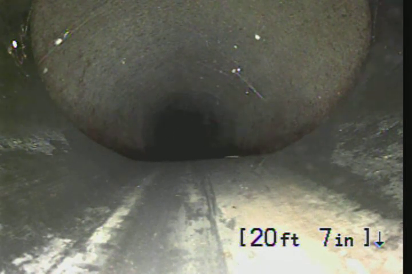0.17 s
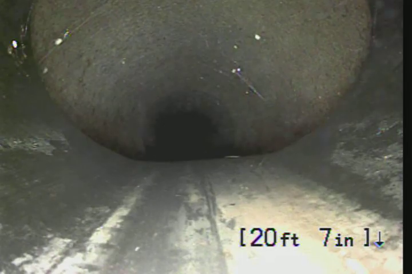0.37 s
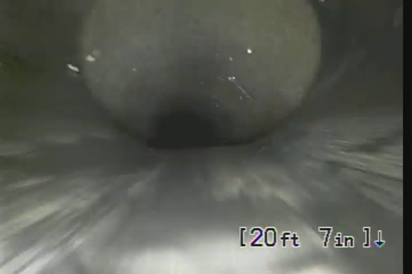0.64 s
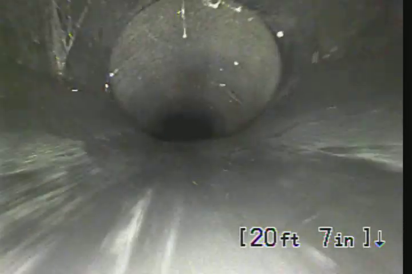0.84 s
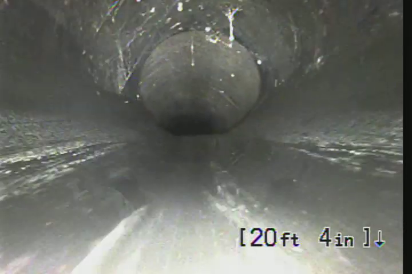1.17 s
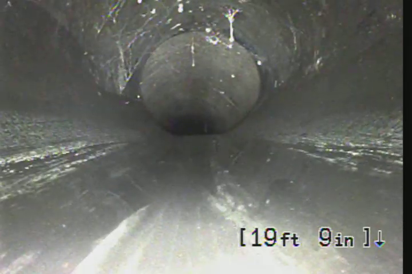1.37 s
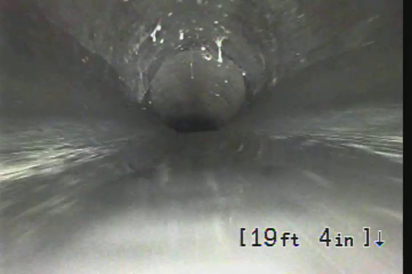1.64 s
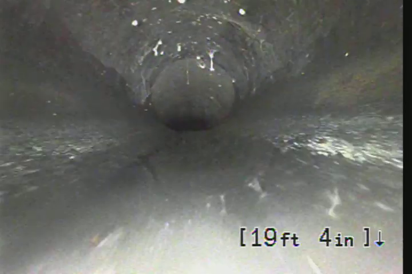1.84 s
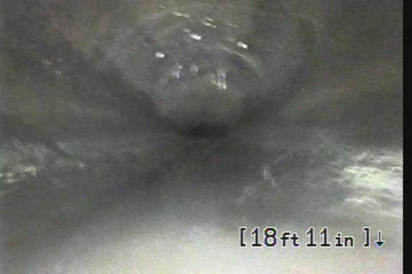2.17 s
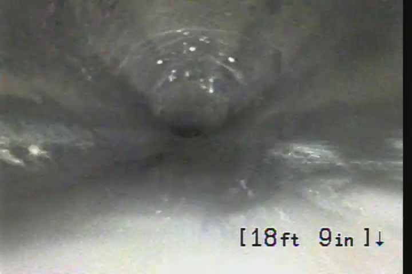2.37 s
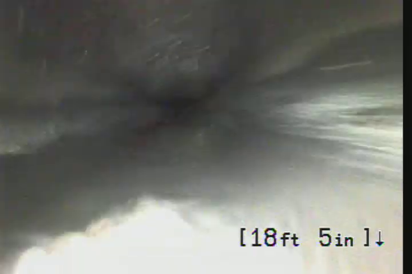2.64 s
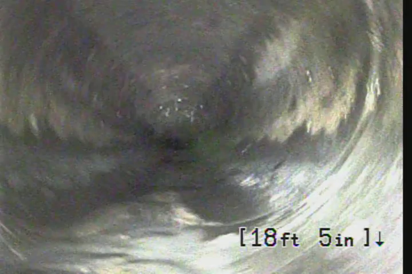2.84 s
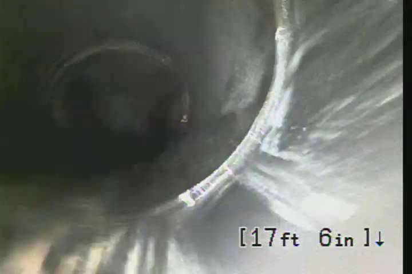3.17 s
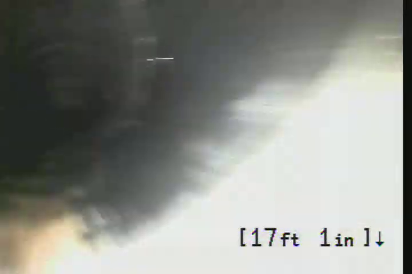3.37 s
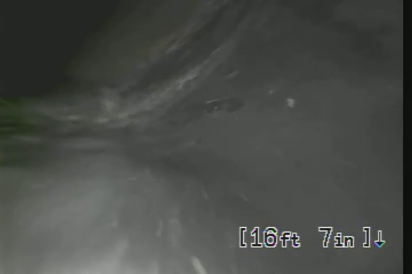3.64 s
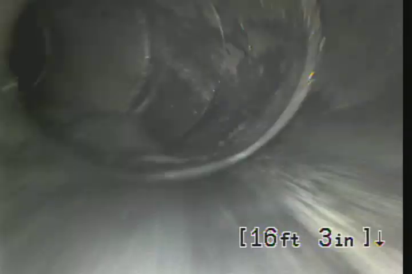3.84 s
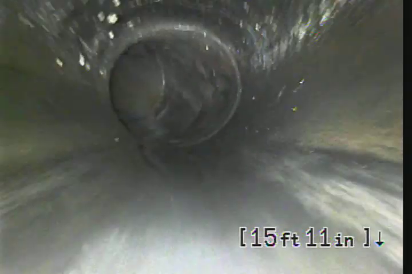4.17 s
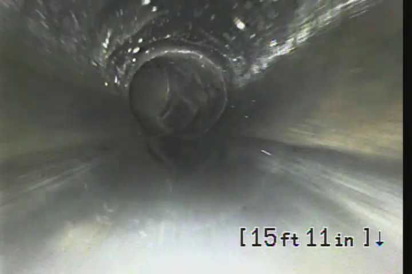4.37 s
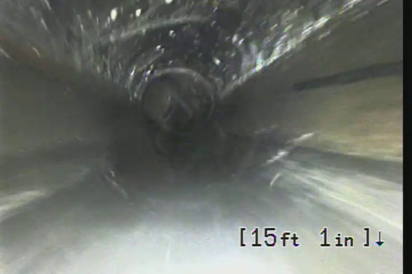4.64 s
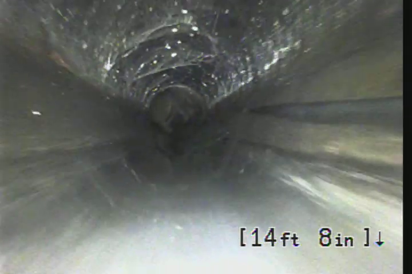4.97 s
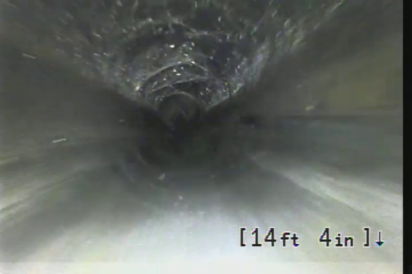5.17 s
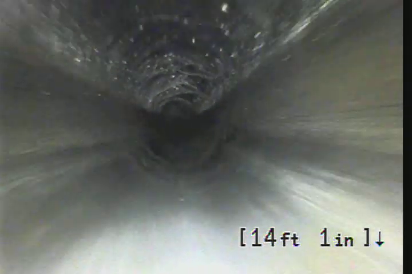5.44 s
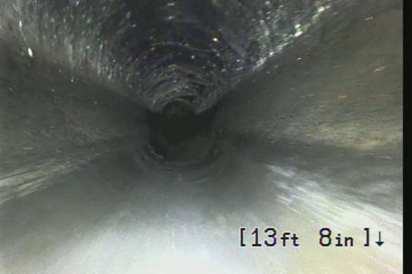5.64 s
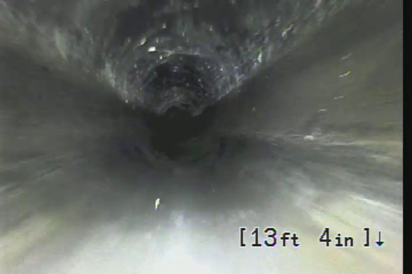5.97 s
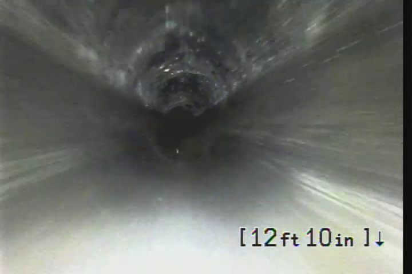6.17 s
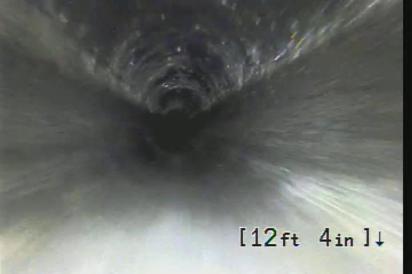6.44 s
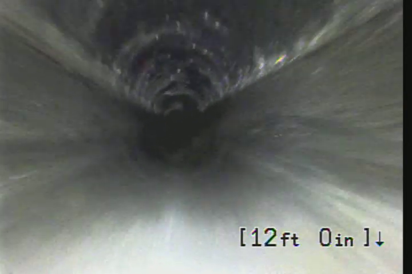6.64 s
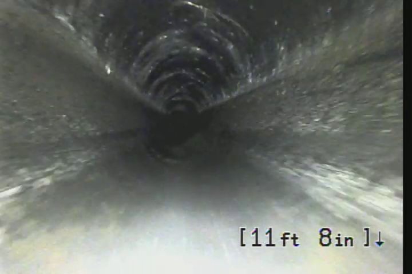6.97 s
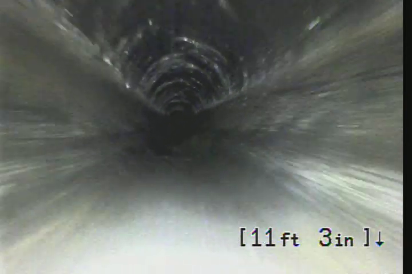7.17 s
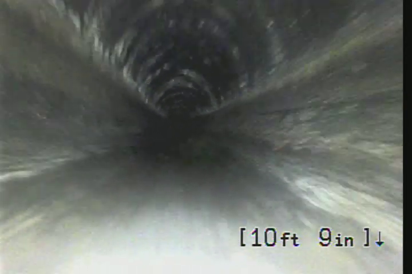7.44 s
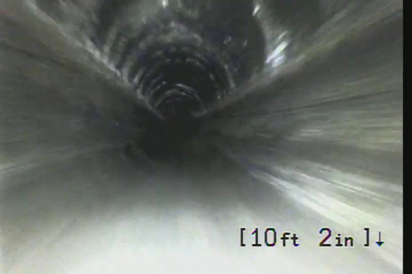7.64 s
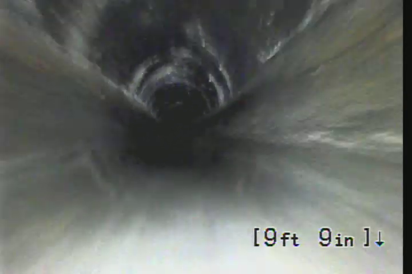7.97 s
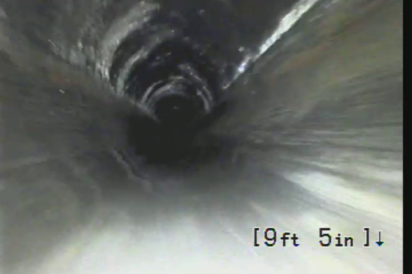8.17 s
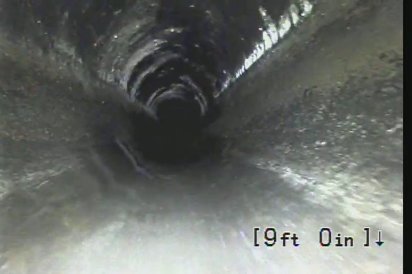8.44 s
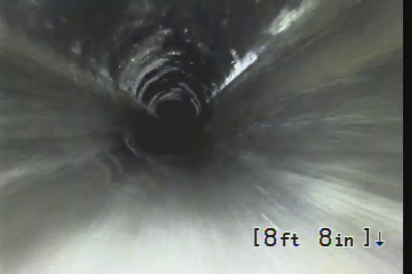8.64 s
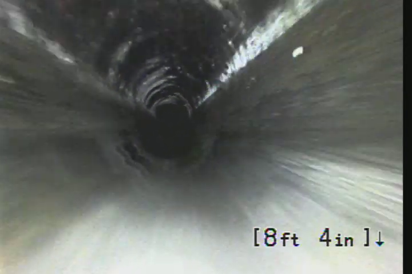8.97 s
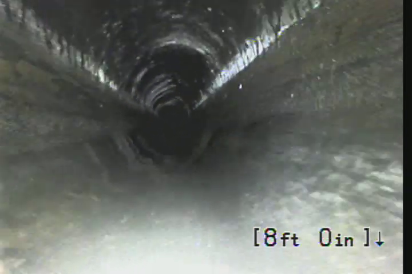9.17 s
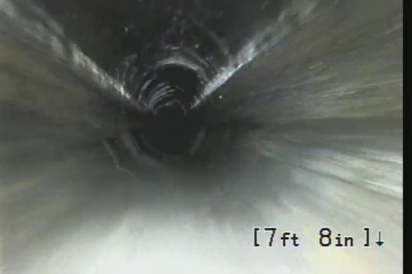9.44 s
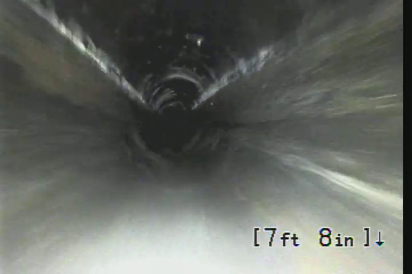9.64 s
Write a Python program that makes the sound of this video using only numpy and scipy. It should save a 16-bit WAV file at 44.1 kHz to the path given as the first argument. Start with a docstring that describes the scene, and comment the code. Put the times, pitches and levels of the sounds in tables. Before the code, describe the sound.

Over constant low room noise, a sliding cable hisses and scrapes, rising and easing with each pull. Clicks, short chattering slaps and hollow dragging notes come from the reel cage, while its drum thuds and rumbles softly around a low pitch. Quieter gaps separate clusters of knocks, the loudest near five and seven seconds. A small cased microphone makes everything muffled and midrange, distorting on the strongest hits.

```python
"""An inspection cable is hauled out of a drain and wound into its hollow drum: hiss and scrape are shaped noise.
Slaps and rubs on the cage are bursts of chattering noise; drags are resonant noise; single contacts are decaying sines.
Thuds and rolling ring two drum modes near 200 Hz, over steady room noise; a narrow treble band flickers.
A narrow-band microphone in a small case colours everything and overloads on the hardest blows."""
import sys
import numpy as np
from scipy.fft import rfft, irfft, next_fast_len
from scipy.io import wavfile
from scipy.ndimage import map_coordinates

SR = 44100
rng = np.random.default_rng(int(sys.argv[2]) if len(sys.argv) > 2 else 0)


def master_out(mix):
    """Clip the mix to full scale and print it as 16-bit PCM to the path in sys.argv[1]."""
    frames = np.transpose(np.atleast_2d(mix))
    ceiling = np.clip(frames, -1, 1)
    pcm = np.round(ceiling * 32767).astype(np.int16)
    wavfile.write(sys.argv[1], SR, pcm)


N = 432621  # samples

# Steady background spectrum: (frequency [Hz], relative density [dB per Hz])
ROOM_SPECTRUM = [(12, -50.5), (20, -30), (83, 1), (204, -3), (267, -6), (406, -8), (551, -21), (822, -15),
                 (1510, -26), (1900, -31), (2470, -64), (4180, -120)]
# Treble passband of the case: (frequency [Hz], relative density [dB per Hz])
TREBLE_SPECTRUM = [(1120, -48.5), (1900, -24), (1980, -21.5), (2090, -9), (2260, -14.5), (2580, -2),
                   (2740, 0.5), (3160, 0.5), (3590, -2.5), (4010, -16), (4450, -44.5), (5780, -61),
                   (9790, -120)]
# Antiresonance of the case: (frequency [Hz], width [Hz])
CASE_NOTCH = (1989, 318)
# Drum modes, lower and upper: (frequency [Hz], width [Hz])
DRUM_MODES = [(181, 24), (211, 21.5)]
# Ring of a thud in the lower and upper drum mode: (t60 [s])
THUD_T60_S = [0.16, 0.11]
# Thuds on the drum: (time [s], strength [dB], share of the lower mode [0-1])
THUDS_ON_DRUM = [(.66, -16.5, 0.76), (.695, -18, 0.74), (.734, -14, 0.8), (.765, -11, .4), (.79, -12, 0.35),
                 (.84, -16, .3), (0.879, -11.5, 0.15), (.953, -17, 0.2), (1.073, -9, 0.37),
                 (1.114, -14.5, 0.03), (1.159, 3, 0.02), (1.222, -5.5, 0.32), (1.625, -2, 0.75),
                 (1.644, 3, 0.25), (1.678, -7.5, 0.47), (2.408, -7.5, 0.5), (2.424, -18, 0.5),
                 (2.813, -15, 0), (2.834, -7.5, 0.23), (2.945, -10, 0.45), (2.958, -9, 0.07),
                 (2.991, -9, 0.47), (3.209, -7, .4), (3.98, -15, 0.26), (4.027, -16.5, .4),
                 (4.051, -9, 0.32), (4.112, -12.5, .4), (4.25, -9.5, 0.26), (4.338, -10, 0.4),
                 (4.47, -16, .2), (4.994, -20, 0), (5.08, 6, 0.58), (5.107, 7.5, 0.1), (5.119, -0.5, .4),
                 (5.138, -4, 0.1), (5.168, -8.5, 0.4), (5.627, -10.5, 0.71), (5.744, -2, .3),
                 (5.831, -3, 0.5), (5.888, -8, .6), (6.332, -15, 0.1), (6.37, -8, 0.43), (6.518, -12, 0.34),
                 (6.768, 5.5, 0.39), (7.012, -17, 0), (7.089, -9, 0.27), (7.117, 1, 0.24),
                 (7.133, 8.5, 0.22), (7.153, 3.5, 0.04), (7.175, 1, .1), (7.193, -10, 0.24),
                 (7.222, -5.5, .2), (7.262, -11.5, 0.12), (7.734, -12.5, 0.04), (7.784, -10.5, 0.5),
                 (7.874, -3.5, 0), (7.936, -11, 0.25), (7.982, -14.5, 0), (8.585, -11, .3),
                 (8.665, -13, 0.32), (8.901, -11, .8), (8.928, -5, 0.45), (8.947, -10, 0.34),
                 (9.318, -14.5, 0.66), (9.429, -9.5, 0.22)]
# Cable rolling in the drum: (time [s], boom level [dB])
ROLL_LEVEL = [(0.0, -56), (0.6, -48), (0.82, -32), (1.97, -48), (2.21, -36), (3.99, -40), (4.18, -33.5),
              (4.75, -40.5), (5.14, -35), (5.57, -46), (5.82, -33), (6.09, -40.5), (6.91, -38), (7.24, -29),
              (7.49, -37.5), (9.23, -43.5), (9.45, -34.5), (9.81, -36)]
# Cage resonances: (frequency [Hz], width [Hz], gain [dB])
CAGE_MODES = [(320, 85, -2), (779, 115, -2.5), (1063, 133, -1.5), (1574, 295, -6.5)]
# Single clean contacts: (time [s], tick level [dB], knock level [dB], push level [dB])
CONTACTS = [(0.0508, -2.5, 2.5, -10.5), (0.162, -11, -39, -43), (1.0655, -2, -28, -36),
            (1.4616, -7, -32, -30), (2.3287, -9.5, -27, -35), (2.7277, -19, -20, -32),
            (2.7706, -21, -19, -25), (2.9562, -15, -12.5, -32), (2.9791, -0.5, -16, -20),
            (3.0274, -28, -14.5, -24), (3.9483, 0.5, -23, -19.5), (5.0536, -10.5, -6.5, -6),
            (5.0882, 2, -8, -11), (5.0915, 2.5, -5, -5), (5.8295, -1, -14, -14.5), (7.1435, 5, -3, -6.5),
            (7.643, 3.5, -24, -18), (8.8853, -14, -12, -24), (8.9779, -13.5, -27, -22),
            (9.0161, -11, -34, -23), (9.0743, -17, -38, -34)]
# Modes of a contact, in the order tick, knock, push: (frequency [Hz], t60 [s])
CONTACT_MODES = [(3107, 0.0052), (713, 0.015), (317, 0.025)]
# Rattling slaps on the cage: (time [s], bright level [dB], woody level [dB], decay length [s])
CAGE_SLAPS = [(0.051, -17.5, -19.5, 0.0068), (.587, -33, -39, 0.016), (0.6344, -25.5, -23, 0.01),
              (0.762, -37, -32, 0.022), (0.847, -29.5, -37, 0.011), (1.0658, -17, -14.5, 0.0058),
              (1.152, -11.5, -14.5, .0066), (1.221, -15, -18, .006), (1.6153, -13, -15.5, 0.0099),
              (1.626, -18, -12.5, 0.0094), (1.919, -32.5, -30.5, 0.016), (2.402, -31, -27, 0.0061),
              (2.811, -33, -33, 0.039), (2.975, -21, -16.5, 0.0036), (3.2064, -19.5, -21, 0.0077),
              (5.067, -29, -25, .008), (5.0762, -15, -12.5, 0.0084), (5.0887, -8, -7, 0.0057),
              (5.098, -14, -14, 0.0064), (5.8266, -10, -14.5, 0.0066), (5.886, -25, -24, 0.0096),
              (6.326, -32.5, -29.5, 0.018), (6.7544, -12.5, -9.5, 0.0082), (7.076, -33, -36, 0.023),
              (7.1246, -10.5, -10.5, 0.0084), (7.141, -10, -8, .007), (7.865, -20.5, -14, 0.0058),
              (8.664, -28, -38, .007), (8.921, -20, -18.5, 0.0089), (9.429, -26, -21.5, 0.012)]
# Drags over the cage: (start [s], length [s], hollow note level [dB], low note level [dB])
CAGE_DRAGS = [(0.51, 0.44, -43, -49.5), (1.1, 0.18, -43, -46), (1.4, 0.42, -49, -49),
              (2.086, 0.065, -40, -45), (2.095, 0.31, -50.5, -42.5), (2.62, 0.27, -42, -48),
              (2.92, 0.15, -38, -47), (3.196, 0.3, -45, -40), (4.11, 0.29, -49.5, -47),
              (5.246, 0.2, -57, -43), (5.675, 0.24, -43, -37.5), (7.078, 0.18, -42, -40),
              (8.505, 0.14, -45, -50), (8.86, 0.24, -52, -42.5), (9.336, 0.18, -49.5, -41.5)]
# How hard the cable slides: (time [s], guide hiss level [dB])
HAUL_LEVEL = [(0.0, -43.5), (0.38, -49.5), (0.6, -47.5), (1.01, -37.5), (1.17, -37), (1.94, -44),
              (2.68, -36), (3.17, -38.5), (3.41, -34), (3.79, -40.5), (4.34, -35.5), (4.92, -39.5),
              (5.11, -39.5), (6.06, -36), (6.61, -39), (7.65, -35), (7.87, -38), (8.91, -39), (9.48, -42),
              (9.81, -36)]

ROOM_DB = -36
HAUL_MID_DB = -39  # usual haul, at which the scrape and low note levels hold
SCRAPE_DB, SCRAPE_DB_PER_HAUL_DB = -42, 0.88
LOW_NOTE_DB, LOW_NOTE_DB_PER_HAUL_DB = -51.5, 0.8
FLICKER_RE_HAUL_DB = -28.5
DRAG_EDGE_S = 0.032
RUB_COUNT, RUB_LENGTH_S = 60, 0.015
RUB_RE_HISS_DB, RUB_SPREAD_DB = 0, 6  # spread is the full width
PREAMP_TOP, PREAMP_KNEE, OUTPUT_TOP = 0.697, 8, 0.712  # amplitude, exponent, amplitude
CHANNEL_HZ, TOP_HZ = 4580, 16000


def amp(db):
    """Gain of a level in dB."""
    return 10 ** (np.asarray(db) / 20)


def unit(x):
    """x at rms 1."""
    return x / np.sqrt(np.mean(x ** 2) + 1e-20)


def curves(rows):
    """One value per sample for each column after the time."""
    time_s, *columns = np.transpose(rows)
    return [np.interp(np.arange(N) / SR, time_s, column) for column in columns]


def wobble(rate_hz):
    """Smooth random curve, rate_hz knots a second."""
    knots = rng.standard_normal(int(N * rate_hz / SR) + 4)
    return map_coordinates(knots, [np.arange(N) * rate_hz / SR])


def filtered(x, response):
    """x filtered by a complex response of frequency."""
    size = next_fast_len(N + SR // 2)
    spectrum = rfft(x, size) * response(np.fft.rfftfreq(size, 1 / SR))
    return irfft(spectrum, size)[:N]


def shape(points):
    """Response through (Hz, dB) points on a log-frequency axis."""
    point_hz, db = np.transpose(points)
    return lambda f: amp(np.interp(np.log(f + 1), np.log(point_hz + 1), db))


def resonance(f, hz, width_hz):
    """Causal resonance of peak gain 1."""
    return 1j * f * width_hz / (hz * hz - f * f + 1j * f * width_hz)


def noise(response):
    """Coloured noise of rms 1."""
    return unit(filtered(rng.standard_normal(N), response))


def cage(f):
    """Cage resonances of alternating sign, rolled off steeply near 2 kHz."""
    body = sum((-1) ** k * amp(db) * resonance(f, hz, width_hz)
               for k, (hz, width_hz, db) in enumerate(CAGE_MODES))
    return body / (1 + (f / 1950) ** 12)


def haul_db():
    """The haul curve, in dB."""
    return curves(HAUL_LEVEL)[0]


def follows_haul(db, db_per_haul_db):
    """A level that rises and falls with the haul."""
    return db + db_per_haul_db * (haul_db() - HAUL_MID_DB)


def room():
    """Steady coloured background noise."""
    return amp(ROOM_DB) * noise(shape(ROOM_SPECTRUM))


def treble_flicker():
    """Narrow flickering noise near 4.15 kHz, its level tied to the haul curve."""
    flickering = amp(4.1 * wobble(70)) * noise(lambda f: resonance(f, 4152, 380) ** 3)
    return amp(haul_db() + FLICKER_RE_HAUL_DB) * flickering


def drum():
    """Thuds and rolling excite two close drum modes; each thud's rings beat."""
    thuds = np.zeros(N + SR)
    t = np.arange(SR // 3) / SR
    rise = 1 - np.exp(-(t / 0.0066) ** 2)  # soft contact: the ring builds gradually
    lower, upper = (rise * amp(-60 * t / t60_s) * np.sin(2 * np.pi * hz * t)
                    for (hz, _), t60_s in zip(DRUM_MODES, THUD_T60_S))
    frame_rock = rise * amp(-27.5 - 60 * t / 0.11) * np.sin(2 * np.pi * 38 * t)
    for time_s, db, low_share in THUDS_ON_DRUM:
        low_share = np.clip(low_share, 0, 1)
        start = round((time_s - 0.005) * SR)  # the push begins before the ring is heard
        ring = low_share * lower + (1 - low_share) * upper
        thuds[start:][:len(t)] += amp(db) * (ring + frame_rock)

    def modes(f):
        return resonance(f, *DRUM_MODES[0]) - 1.2 * resonance(f, *DRUM_MODES[1])

    lumps = amp(curves(ROLL_LEVEL)[0] + 3.6 * wobble(25))
    return thuds[:N] + lumps * noise(modes)


def contacts():
    """A single contact rings each mode once, as a decaying sine."""
    out = np.zeros(N + SR)
    t = np.arange(SR // 20) / SR
    rise = 1 - np.exp(-(t / 0.00062) ** 2)
    for time_s, *levels_db in CONTACTS:
        ring = sum(amp(db - 60 * t / t60_s) * np.sin(2 * np.pi * hz * t)
                   for db, (hz, t60_s) in zip(levels_db, CONTACT_MODES))
        out[round(time_s * SR):][:len(t)] += rise * ring
    return out[:N]


def rubs():
    """Faint slaps at chance moments, at levels scattered about the haul's."""
    draw = rng.random((RUB_COUNT, 3))
    times_s = draw[:, 0] * (N - 1) / SR
    hiss_db = haul_db()[(times_s * SR).astype(int), None]
    levels_db = hiss_db + RUB_RE_HISS_DB + RUB_SPREAD_DB * (draw[:, 1:] - 0.5)
    return [(time_s, *both_db, RUB_LENGTH_S) for time_s, both_db in zip(times_s, levels_db)]


def slaps():
    """Each slap is a burst of chatter that swells in milliseconds, then dies at its own rate."""
    bright, woody = np.zeros(N + SR), np.zeros(N + SR)
    t = np.arange(SR // 8) / SR
    for time_s, bright_db, woody_db, length_s in CAGE_SLAPS + rubs():
        burst = (1 - np.exp(-t / 0.0033)) * np.exp(-(t / max(length_s, 0.002)) ** 1.32)
        burst += amp(-15.5 - 60 * t / 0.17) * (1 - np.exp(-t / 0.0067))  # short tail of the room
        start = round(time_s * SR)
        bright[start:][:len(t)] += amp(bright_db) * burst
        woody[start:][:len(t)] += amp(woody_db) * burst
    chatter = amp(2.2 * wobble(300))  # the contact breaks up into uneven impacts
    bright_part = bright[:N] * noise(shape(TREBLE_SPECTRUM))
    woody_part = woody[:N] * noise(cage)
    return chatter * (bright_part + woody_part)


def drags():
    """Dragging sounds a wavering hollow note and a low note in lumps; the low note also follows the haul."""
    t = np.arange(N) / SR
    hollow_level, low_level = sum(
        amp(levels_db)[:, None] * np.clip(np.minimum(t - start_s, start_s + length_s - t) / DRAG_EDGE_S, 0, 1)
        for start_s, length_s, *levels_db in CAGE_DRAGS)
    turn = np.pi / 4 * (1 + np.tanh(0.59 * wobble(15)))  # crossfade angle between two close modes
    hollow = np.cos(turn) * noise(lambda f: resonance(f, 730, 45) ** 2)
    hollow += np.sin(turn) * noise(lambda f: resonance(f, 810, 45) ** 2)
    hollow_lumps = amp(2.5 * wobble(23) + 3.3 * wobble(70))
    low = noise(lambda f: resonance(f, 342, 110) ** 2)
    low_level = low_level + amp(follows_haul(LOW_NOTE_DB, LOW_NOTE_DB_PER_HAUL_DB))
    return hollow_level * hollow_lumps * hollow + low_level * amp(2.6 * wobble(14)) * low


def haul():
    """The sliding cable: a guide hiss and a duller cage scrape that share a slow flutter."""
    flutter_db = 1.5 * wobble(22)
    hiss_db = haul_db() + flutter_db + 1.0 * wobble(70)
    hiss = amp(hiss_db) * noise(shape(TREBLE_SPECTRUM))
    scrape_db = follows_haul(SCRAPE_DB, SCRAPE_DB_PER_HAUL_DB) + flutter_db + 1.1 * wobble(40)
    return hiss + amp(scrape_db) * noise(cage)


def scene():
    """Room, treble flicker, drum, cage and cable summed to one channel."""
    cage_sounds = contacts() + slaps() + drags()
    return (room() + treble_flicker() + drum() + cage_sounds + haul())[None]


def soft_clip(x, top, knee):
    """Ceiling with a knee; a higher exponent is harder."""
    return x / (1 + np.abs(x / top) ** knee) ** (1 / knee)


def record(dry):
    """The case weakens one narrow band; the preamp overloads, a narrow channel follows, its overshoot is clipped."""
    cased = filtered(dry[0], lambda f: 1 - 0.9 * resonance(f, *CASE_NOTCH))
    overloaded = soft_clip(cased, PREAMP_TOP, PREAMP_KNEE)
    narrow = filtered(overloaded, lambda f: 1 / (1 + (f / CHANNEL_HZ) ** 70))
    clipped = np.clip(narrow, -OUTPUT_TOP, OUTPUT_TOP)
    return filtered(clipped, lambda f: f < TOP_HZ)[None]


dry = scene()
out = record(dry)
master_out(out)
```